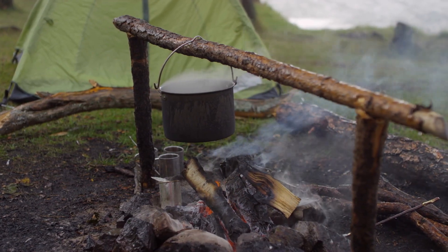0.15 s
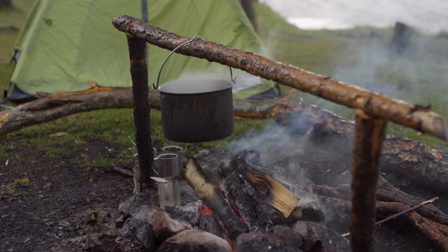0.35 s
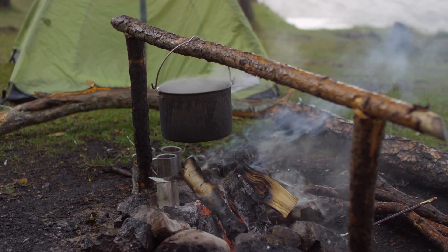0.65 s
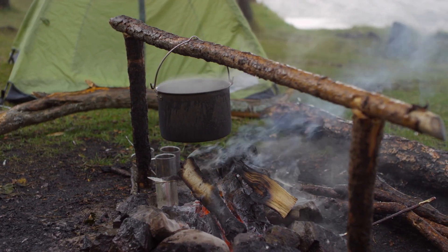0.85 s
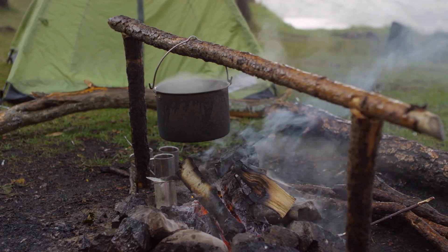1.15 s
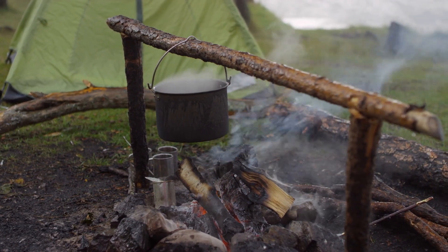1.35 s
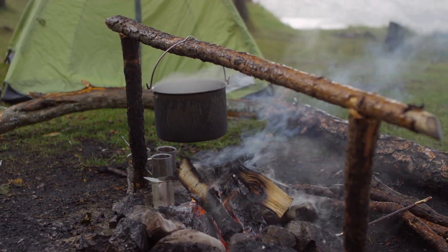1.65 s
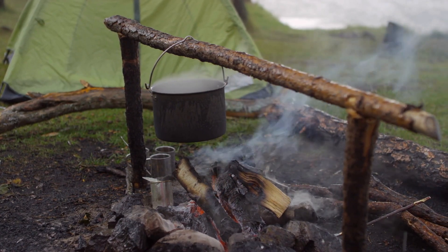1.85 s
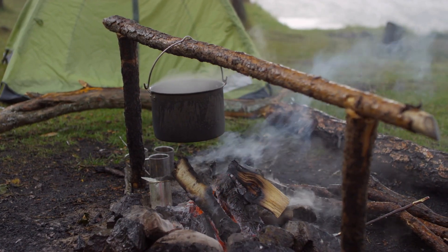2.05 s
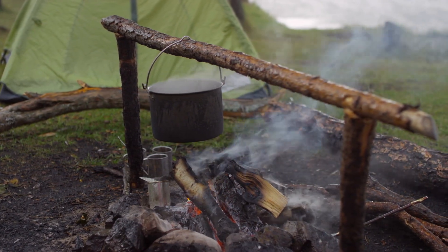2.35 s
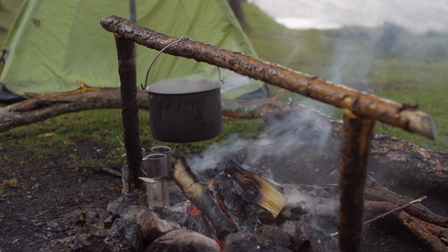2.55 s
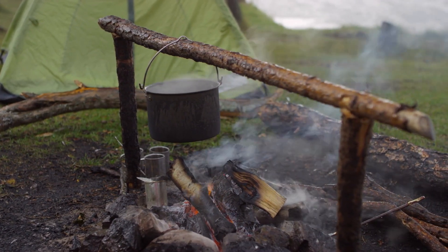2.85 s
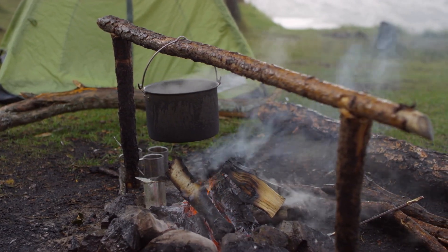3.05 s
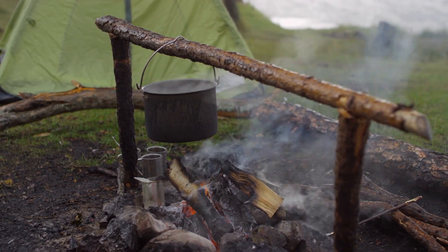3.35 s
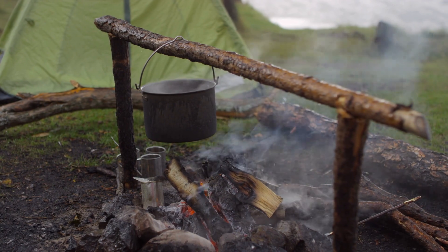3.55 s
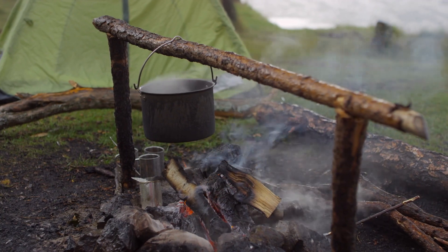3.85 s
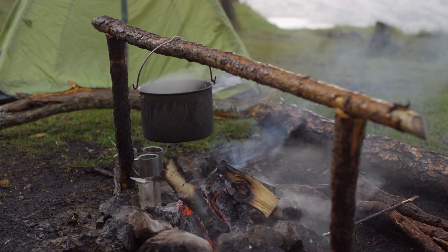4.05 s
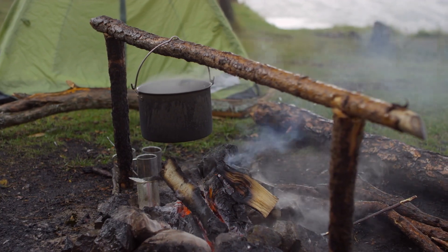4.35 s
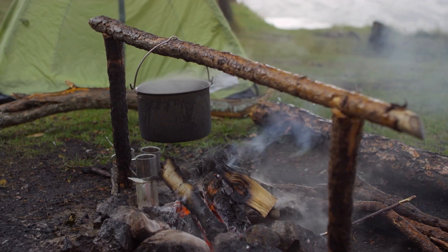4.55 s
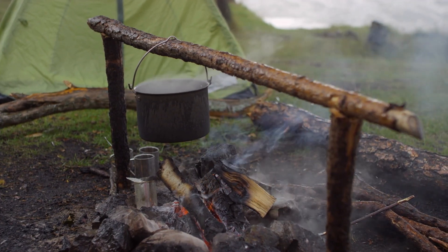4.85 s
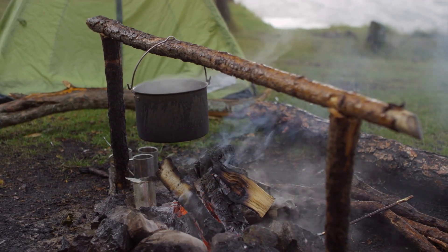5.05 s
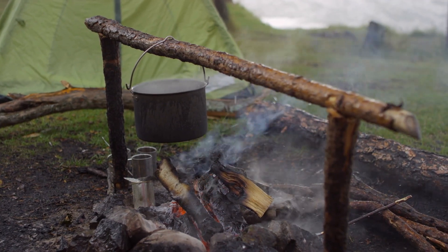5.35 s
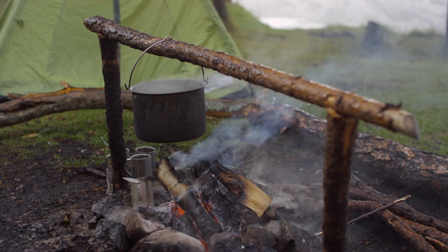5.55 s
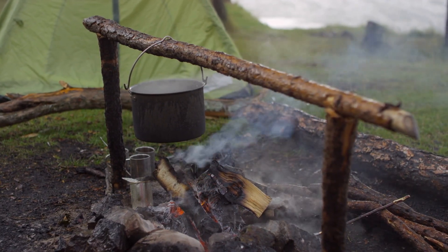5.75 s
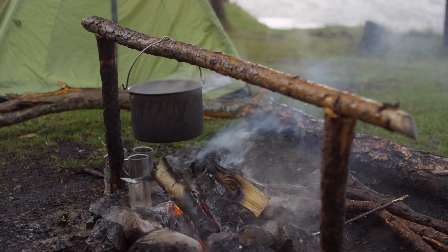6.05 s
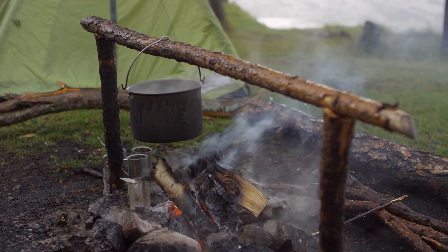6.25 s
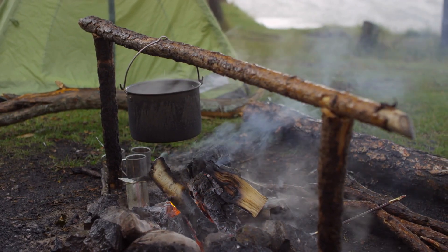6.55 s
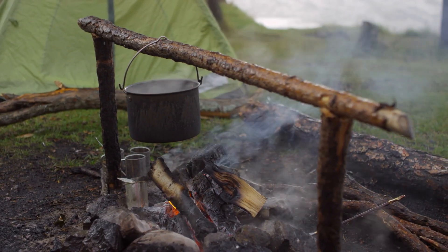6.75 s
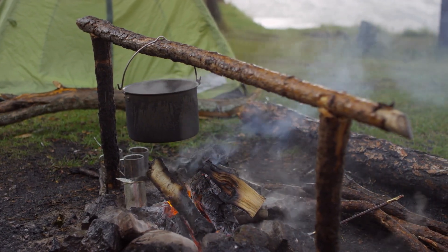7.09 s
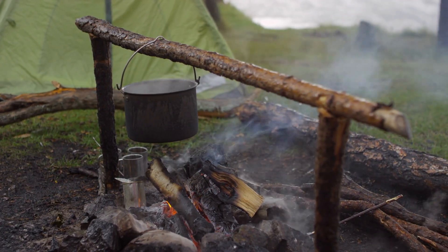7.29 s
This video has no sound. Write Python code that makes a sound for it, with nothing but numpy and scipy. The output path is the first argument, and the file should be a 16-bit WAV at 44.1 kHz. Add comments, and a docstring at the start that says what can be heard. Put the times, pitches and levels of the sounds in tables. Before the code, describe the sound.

Sharp, uneven snaps and pops come from a nearby campfire in open grassland, over a soft low roar, a thin high sizzle and small ember ticks. One loud crack stands out about a second in. Far behind, a songbird whistles two short phrases, one early and one late, each followed by a smaller bird's twitter, with a faint cricket underneath. The fire swells and crackles more densely towards the end. The sound is close and in stereo.

```python
"""A wood campfire in a meadow, heard in stereo from a metre or two away.
From the start, swirling flames rumble, damp wood sizzles, embers tick and a cricket chirps with its wings.
Almost at once, gas pockets in the logs begin to burst: sharp snaps that bounce off the ground and stones.
Further off, a songbird whistles at half a second, then a small bird twitters. Both return around six
seconds, just before the flames flare up and the snaps come thick and fast."""
import sys
import numpy as np
from scipy import signal
from scipy.io import wavfile

SR = 44100
rng = np.random.default_rng(int(sys.argv[2]) if len(sys.argv) > 2 else 0)


def master(y):
    """Save y as 16-bit WAV."""
    cut = np.clip(np.atleast_2d(y).T, -1, 1)
    pcm = np.round(cut * 32767)  # scale
    wavfile.write(sys.argv[1], SR, pcm.astype(np.int16))


N = 327222


def from_db(db):
    """Turn decibels into a number to multiply by."""
    return 10 ** (np.asarray(db) / 20)


def rms_one(x):
    """Scale a sound so its average strength (rms) is 1."""
    return x / np.sqrt(np.mean(x ** 2) + 1e-20)


def energy_one(x):
    """Scale a sound so its total energy is 1."""
    return x / np.sqrt(np.sum(x ** 2))


def at_pitch(table, hz):
    """Read a table between its rows, with pitch spaced in octaves."""
    pitches, values = np.transpose(table)
    return np.interp(np.log(hz), np.log(pitches), values)


def drift(rate_hz):
    """A smooth random wobble of about size 1; a higher rate wobbles faster."""
    r = np.exp(-80 * np.pi * rate_hz / SR)
    slow = signal.lfilter([1], [1, -2 * r, r * r], rng.standard_normal(N // 40 + 2002))[2000:]
    return np.interp(np.arange(N) / 40, np.arange(len(slow)), rms_one(slow))


def resonance(x, hz, width_hz):
    """Let a sound ring around one pitch."""
    r = np.exp(-np.pi * width_hz / SR)
    feedback = [1, -2 * r * np.cos(2 * np.pi * hz / SR), r * r]
    return signal.lfilter((1 - r * r) / 2 * np.array([1, 0, -1]), feedback, x)


def stereo(mid, side, alike):
    """Make left and right: unrelated when alike is 0, the same when it is 1."""
    return (np.sqrt(1 + alike) * mid + np.sqrt(1 - alike) * side * np.array([[1], [-1]])) / np.sqrt(2)


# How alike the fire's noise is on the left and right: pitch_hz, alike_0_to_1
LIKENESS = [(25, 0.32), (80, 0.51), (500, 0.79), (3000, 0.55), (7000, 0.83), (12000, 1)]
def flickering_noise(tone, shared_db, own_db, rate_hz):
    """Stereo noise in half-octave bands that flicker partly together, partly on their own."""
    out, together = 0, drift(rate_hz)
    edges = tone[0][0] * np.sqrt(2) ** np.arange(np.log2(tone[-1][0] / tone[0][0]) * 2 + 1)
    white = rng.standard_normal((2, 2, N))
    for k, (low, high) in enumerate(zip(edges, np.minimum(edges[1:], .45 * SR))):
        band = signal.butter(2, [low, high], "band", fs=SR, output="sos")
        mid, side = signal.sosfilt(band, white[k % 2])
        hz = np.sqrt(low * high)
        gain = from_db(at_pitch(tone, hz) + shared_db * together + own_db * drift(rate_hz))
        out = out + gain * stereo(mid, side, at_pitch(LIKENESS, hz))
    return rms_one(out)


# How the flames rise and fall: time_s, rumble_db, roar_db
FLAME_LEVELS = [(0.0, -44, -51.5), (0.22, -39.5, -43.5), (0.44, -45.5, -47.5), (0.8, -46.5, -51),
                (0.96, -55.5, -54), (1.32, -44.5, -51), (1.74, -44, -51.5), (2.12, -38, -47.5),
                (2.42, -44.5, -47), (2.88, -43.5, -49), (3.94, -43, -48), (4.16, -50, -52), (4.5, -44, -44),
                (4.75, -53.5, -53.5), (5.2, -56.5, -55.5), (5.5, -44, -47), (6.3, -46, -50.5),
                (6.45, -39, -48), (6.6, -32, -38), (6.9, -42.5, -48.5), (7.42, -38, -46.5)]
# The roar's tone, from low to high: pitch_hz, relative_db
ROAR_TONE = [(20, -8), (60, 2.5), (111, -4.5), (180, -13.5), (450, -15), (720, -17), (1500, -22.5),
             (2600, -30.5)]
# Air ringing between the logs: pitch_hz, width_hz, above_roar_db
LOG_HOLLOWS = [(314, 80, -7.5), (534, 75, -10)]
def flames(rumble_hz=103.6):
    """Swirling, burning gas makes a fluttering rumble and a broad roar that rings the hollows."""
    low_noise = resonance(rng.standard_normal((2, N)), rumble_hz, width_hz=36)
    mid, side = resonance(low_noise, rumble_hz, width_hz=54)
    rumble = rms_one(stereo(mid, side, alike=1) * from_db(1.9 * drift(14.5)))
    roar = flickering_noise(ROAR_TONE, shared_db=1.5, own_db=3.5, rate_hz=11.2)
    for hz, width_hz, level_db in LOG_HOLLOWS:
        mid, side = resonance(rng.standard_normal((2, N)), hz, width_hz)
        roar += from_db(level_db + 4.27 * drift(23)) * rms_one(stereo(mid, side, alike=.97))
    time_s, *levels = np.transpose(FLAME_LEVELS)
    rumble_db, roar_db = [np.interp(np.arange(N) / SR, time_s, db) for db in levels]
    return from_db(rumble_db) * rumble + from_db(roar_db) * roar


# How the sizzle rises and falls: time_s, level_db
SIZZLE_LEVELS = [(0.0, -57.5), (1.42, -59), (1.63, -67), (2.89, -57.5), (3.41, -57), (3.91, -59),
                 (4.55, -58), (5.1, -62.5), (5.89, -56), (6.1, -68), (6.34, -63), (6.61, -59.5),
                 (7.07, -60), (7.42, -55.5)]
# The sizzle's tone: pitch_hz, relative_db
SIZZLE_TONE = [(2000, 6.5), (3700, -3), (5900, 7), (9000, 8.5), (13000, 14), (17000, -17.5)]
def damp_wood():
    """Damp wood gives a high, flickering sizzle. Returns the sound and its level over time."""
    level_db = np.interp(np.arange(N) / SR, *np.transpose(SIZZLE_LEVELS))
    hiss = flickering_noise(SIZZLE_TONE, shared_db=1, own_db=.8, rate_hz=40)
    return from_db(level_db) * hiss, level_db


# The tone of a crack in the wood: pitch_hz, relative_db
CRACK_TONE = [(1500, -12), (3000, 0), (5500, -5), (8500, -0.5), (12500, -3), (15500, -8)]
def wood_bursts(rows, spike_s=.00015, rattle=.033, echo_s=.002, ragged_db=6.5):
    """Each burst cracks and knocks, rattles among the logs, bounces off the ground, then scatters."""
    size = 4000
    t = np.arange(size) / SR
    crack, knock = np.zeros((2, 2, N + size))
    direct = energy_one(np.exp(-t / spike_s) + rattle * (t < echo_s))
    near, far = [energy_one(from_db(-60 * t / fade_s)) for fade_s in (.028, .13)]
    tails = from_db(-7) * near + from_db(-18) * far
    noises, chances = rng.standard_normal((len(rows), 2, size)), rng.standard_normal((len(rows), 45))
    for (start_s, crack_db, knock_db), (mid, side), chance in zip(rows, noises, chances):
        bumps, (height, bounce, pan, dullness) = chance[:41], chance[41:]
        since_echo = t - echo_s * from_db(height)  # a higher burst echoes later
        echo = from_db(-3 + 4 * bounce) * energy_one((since_echo >= 0) * np.exp(-abs(since_echo) / .0006))
        scatter = tails * from_db(ragged_db * np.interp(np.arange(size) / 100, np.arange(41), bumps))
        shape = direct + echo + scatter
        burst = stereo(shape * mid, (shape + scatter) * side, alike=.94)
        burst = energy_one(signal.lfilter([1, np.tanh(.11 * dullness - .2)], 1, burst))
        burst *= from_db(crack_db + 5 + .63 * pan * np.array([[.5], [-.5]]))
        at = round(start_s * SR)
        crack[:, at:at + size] += burst
        knock[:, at:at + size] += burst * from_db(knock_db)
    hz = np.maximum(np.arange(257) * SR / 512, 1)
    tone_db = at_pitch([(300, -74.5)] + CRACK_TONE, hz)
    # minimum_phase keeps the start sharp but halves the decibels, so double them first
    tone = signal.minimum_phase(signal.firwin2(255, np.arange(257) / 256, from_db(2 * tone_db)))
    woody = signal.butter(3, [1100, 3500], "band", fs=SR, output="sos")
    out = from_db(5.5) * signal.lfilter(tone, 1, crack) + from_db(9) * signal.sosfilt(woody, knock)
    return out[:, :N]


def embers(sizzle_db, ticks_per_s=28):
    """Embers tick at random: many small ticks, few large, all louder when the sizzle is louder."""
    gap, strength, woodiness = rng.random((360, 3)).T
    start_s = np.cumsum(-np.log(gap) / ticks_per_s)
    keep = start_s < N / SR
    size = np.minimum(-np.log(strength[keep]), 3)
    crack_db = sizzle_db[(start_s[keep] * SR).astype(int)] + 25 + 2.5 * size
    knock_db = 14 * woodiness[keep] - 22.5
    return wood_bursts(np.c_[start_s[keep], crack_db, knock_db])


# Runs of almost evenly spaced chirps: start_s, end_s, level_db
CHIRP_RUNS = [(.037, .6, -63), (.8, 1.6, -70), (2.22, 2.8, -68), (2.976, 5.1, -63), (5.3, 5.9, -68),
              (6.06, 6.1, -64), (6.78, 7.3, -63)]
def cricket(pitch_hz=4700, stroke_s=.0365, every_s=.255, jitter_s=.008, spread_db=1.5, chorus_db=-73):
    """Four wing strokes a chirp, each falling in pitch, blurred by grass; a far chorus fills in."""
    t = np.arange(round(4 * stroke_s * SR)) / SR
    stroke = t % stroke_s / stroke_s
    phase = 2 * np.pi * np.cumsum(pitch_hz * (1.025 - .05 * stroke)) / SR
    swell = 1.6 * np.sin(np.pi * t / t[-1]) ** .6  # the middle strokes are strongest
    chirp = swell * np.sin(np.pi * stroke) ** 2 * np.sin(phase)
    starts = np.zeros(N)
    for start_s, end_s, level_db in CHIRP_RUNS:
        times = np.arange(start_s, end_s, every_s)
        late, louder = rng.standard_normal((2, len(times)))
        starts[((times + jitter_s * late) * SR).astype(int)] = from_db(level_db + spread_db * louder)
    chorus = rms_one(resonance(rng.standard_normal((2, N)), pitch_hz, width_hz=200))
    blur = rms_one(1 + .5 * np.array([drift(90), drift(90)]))
    return signal.fftconvolve(starts, chirp)[:N] * blur + from_db(chorus_db) * chorus


# Gas pockets bursting, with relative levels: start_s, crack_db, knock_above_crack_db
GAS_POCKETS = [(0.0746, -0.5, -12.5), (0.1131, -2.5, -14), (0.2283, -5, -16), (0.365, -6.5, -11),
               (0.3967, -20, -10), (0.4537, -1, -14), (0.4923, -14.5, -20), (0.658, -18, -2),
               (0.7701, -19.5, 4.5), (0.7802, -8, -8), (0.8777, -14, -12), (0.9249, -19.5, -0.5),
               (1.1477, 11, -11.5), (1.3241, -2, -17), (1.4315, -24, -15), (1.4456, -23, -13),
               (1.5344, -18, -4.5), (1.8393, -23, -7), (1.8936, -18.5, -19), (2.0097, -21, -21),
               (2.0587, -18, -8), (2.0885, -18.5, -5), (2.2127, -10.5, -7), (2.2331, -18, -14.0),
               (2.2544, -14, -14), (2.27, -31, -11), (2.2763, -15, -13), (2.2998, -4, -9),
               (2.3761, -12.5, -9), (2.529, -7, -6), (2.5451, -9, -7), (2.565, -8, -7.5),
               (2.6378, -13.5, -4), (2.6545, -10, -7), (2.6769, -11.5, -11), (2.6905, -16.5, -8),
               (2.7725, -11, -11), (2.8106, 0.5, -10.5), (2.8519, -10.0, -15), (2.9552, -3, -12),
               (2.9914, -0.5, -9.5), (3.0132, -22, -11.0), (3.1719, -17.5, 1.5), (3.2635, -16.5, -6.0),
               (3.2881, -7, -14), (3.3507, 0, -12), (3.3624, -12, -15), (3.4906, -12.5, 3),
               (3.5285, -15, 0), (3.5939, -6, -8), (3.6529, -17.5, -7), (3.8024, -10.5, -33),
               (3.8084, -14, 2.5), (3.8402, -18.5, -3), (4.0126, -5.5, -8.5), (4.19, -7, -9),
               (4.3048, -12.5, 3.5), (4.3503, -0.5, -10), (4.3669, -1.5, -8.5), (4.4111, -13, -7),
               (4.5161, -14.5, -16), (4.5434, -10.5, -10), (4.5778, -17, -1.5), (4.768, -23.5, -12),
               (5.135, -22.5, -17), (5.1822, -6, -10), (5.2849, -9, -6), (5.3145, -3.5, -9),
               (5.3221, -10.5, -14), (5.5667, 0, -11), (5.6758, -13.5, 2), (5.7262, -5, -16),
               (5.7762, -12, -33), (5.8343, -15, -12), (6.0469, -7, -7.5), (6.0868, -16.5, 1),
               (6.4318, -20.5, -1), (6.4529, -16.5, 0), (6.5279, 1.5, -12), (6.5467, -13, -20),
               (6.5777, 1, -30), (6.5829, 0, -14), (6.6241, -9, -38), (6.7747, -3, -15), (6.8329, -11, -32),
               (6.8417, -22, 4), (6.9008, -15, -8), (6.9485, -5, -11), (7.0484, -7, -9.5), (7.148, 0, -13),
               (7.1773, -16, -25), (7.183, -9, -19), (7.2106, -20, -23), (7.2298, -8, -15),
               (7.2492, 2, -13), (7.2832, -18, -9), (7.3228, -8.5, -16), (7.3497, -0.5, -31),
               (7.3596, -10.5, 0)]
def snaps():
    """Gas trapped in the logs breaks out with sharp snaps."""
    return wood_bursts(GAS_POCKETS)


def bird_notes(notes, warble=.0113, echo_db=-1, echo_fade_s=.3):
    """Almost pure, sliding notes with soft ends and a slight warble, smeared by echoes from trees."""
    song, wobble, flutter = np.zeros(N), drift(45), drift(42)
    for start_s, length_s, from_hz, to_hz, level_db in notes:
        i = round(start_s * SR) + np.arange(round(length_s * SR))
        hz = np.linspace(from_hz, to_hz, len(i)) * (1 + warble * wobble[i])
        level = from_db(level_db + 1.9 * flutter[i]) * signal.windows.tukey(len(i), .18)
        song[i] += np.sqrt(2) * level * np.sin(2 * np.pi * np.cumsum(hz) / SR)
    t = np.arange(round(echo_fade_s * SR)) / SR
    trees = energy_one(rng.standard_normal((2, len(t))) * from_db(-60 * t / echo_fade_s)) * np.sqrt(2)
    return song + from_db(echo_db) * signal.fftconvolve(song[None], trees, axes=1)[:, :N]


# The songbird's notes: start_s, length_s, from_hz, to_hz, level_db
SONGBIRD_NOTES = [(.45, 0.056, 1606, 1750, -59), (.63, 0.17, 1852, 1730, -58),
                  (.82, 0.046, 1740, 2070, -60), (.94, .12, 2337, 2275, -53.5),
                  (1.03, 0.133, 2200, 1920, -54.5), (1.18, 0.03, 1535, 1420, -64),
                  (1.215, 0.042, 1380, 1740, -59.5), (1.255, 0.086, 1736, 1698, -54),
                  (5.74, .11, 1705, 1990, -59.5), (5.86, 0.09, 2090, 2030, -56.5),
                  (5.96, 0.11, 1870, 1710, -56.5), (6.14, 0.062, 2003, 1940, -58),
                  (6.29, 0.071, 1770, 1765, -54)]
def songbird():
    """A songbird whistles two short phrases."""
    return bird_notes(SONGBIRD_NOTES)


# The small bird's notes: start_s, length_s, from_hz, to_hz, level_db
SMALL_BIRD_NOTES = [(1.66, .035, 2900, 2760, -61), (1.69, .16, 2820, 2820, -72),
                    (1.785, .03, 2700, 2480, -61), (6.28, .14, 3950, 3860, -67),
                    (6.68, .065, 3490, 3010, -65), (6.74, .035, 3010, 3480, -65),
                    (6.99, .04, 5550, 4970, -67)]
def small_bird():
    """A small bird twitters, higher and fainter than the songbird."""
    return bird_notes(SMALL_BIRD_NOTES)


def scene():
    """Add the fire and the quieter animals together."""
    sizzle, sizzle_db = damp_wood()
    fire = sizzle + snaps() + embers(sizzle_db) + flames()
    return fire + songbird() + small_bird() + cricket()


def record(dry, hiss_db=-72, lag_samples=.25, cutoff_hz=16000):
    """Two microphones, the left a bit quieter and later; faint hiss, rounded peaks, highest treble cut."""
    left, right = dry * from_db([[-.6], [.6]])
    delay = [1 - lag_samples, 1 + lag_samples]
    left = signal.lfilter(delay, delay[::-1], left)
    both = np.tanh(np.array([left, right]) + from_db(hiss_db) * rng.standard_normal(N))
    return signal.sosfilt(signal.ellip(8, .5, 70, cutoff_hz, fs=SR, output="sos"), both)


dry = scene()
out = record(dry)
master(out)
```